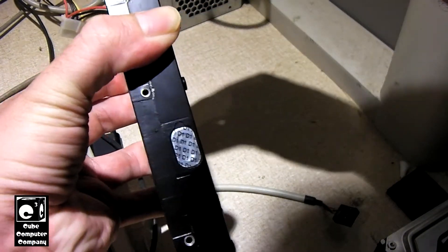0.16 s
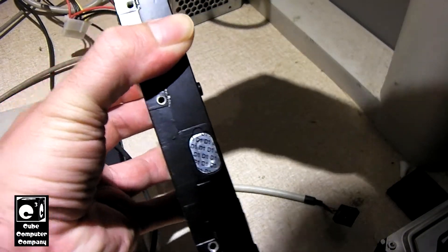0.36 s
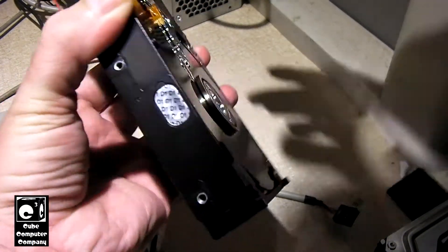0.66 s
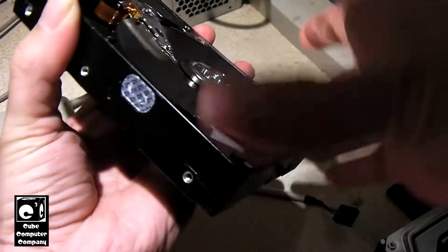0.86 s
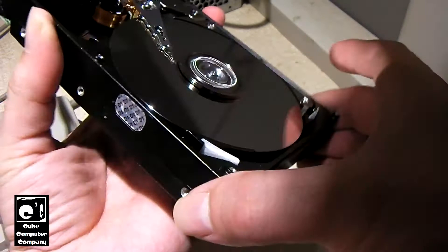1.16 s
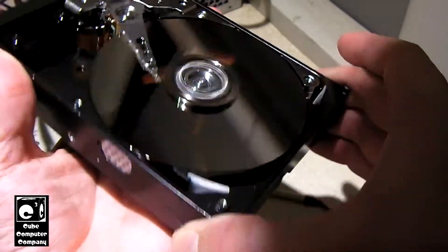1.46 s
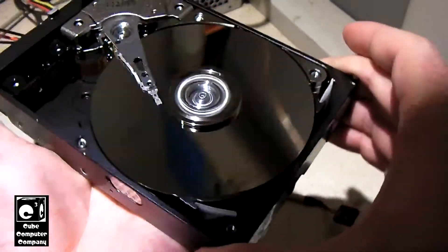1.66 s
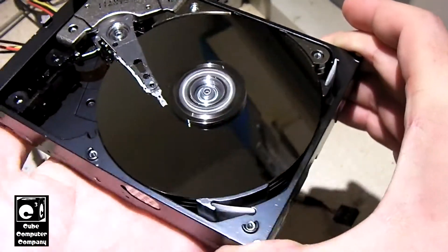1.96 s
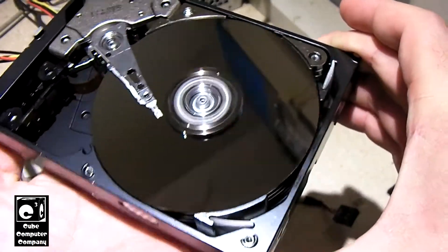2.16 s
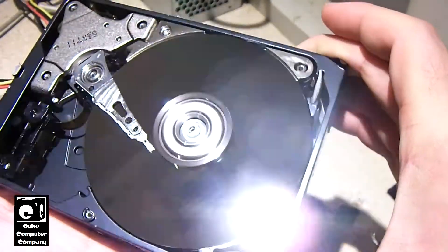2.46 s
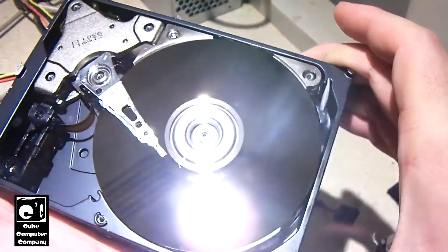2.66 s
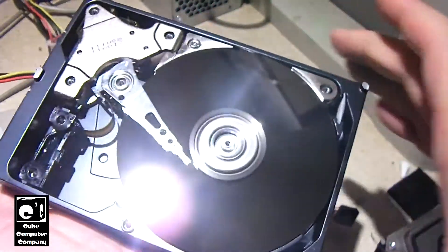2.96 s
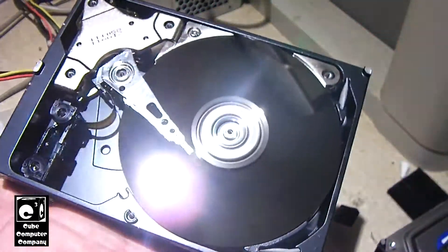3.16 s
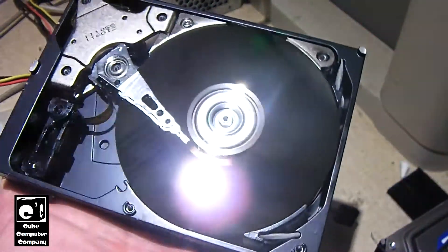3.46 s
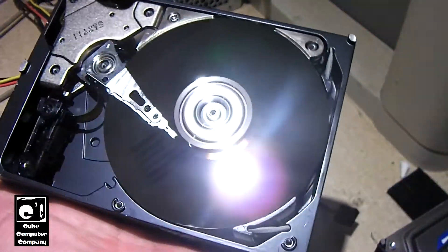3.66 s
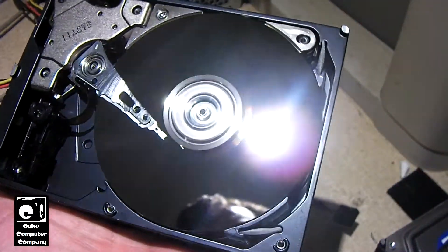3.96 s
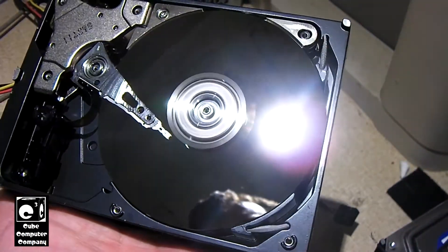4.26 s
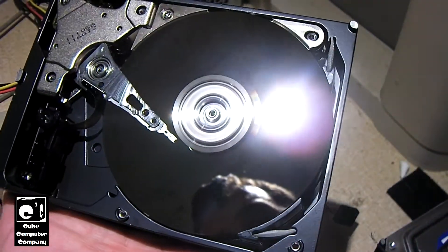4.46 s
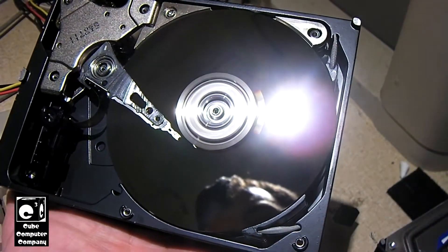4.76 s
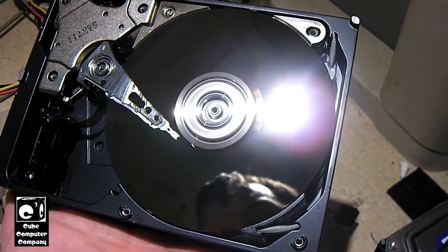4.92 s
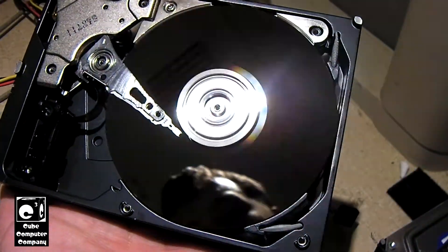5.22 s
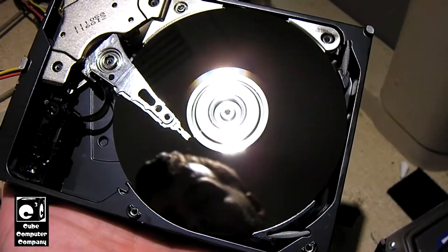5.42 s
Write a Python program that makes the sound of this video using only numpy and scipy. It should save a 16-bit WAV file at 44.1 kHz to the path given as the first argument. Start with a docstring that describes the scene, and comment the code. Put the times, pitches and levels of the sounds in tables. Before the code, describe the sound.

Close stereo pickup of a small disk drive starting up: light ticks, a bright electric buzz that stops abruptly, then fine scraping hiss with rising whines. Hard, dry clacks of the arm come over it in the first two seconds. Afterwards the spin smooths out and hollow, airy whooshing grows ever louder, covering a quiet, steady fan murmur in the room. No winding down is heard.

```python
"""An open hard drive, held near a camera, starts up: its motor buzzes in pulses while it finds its rotor.
Then the platters gather speed, and rubbing and motor steps ring them; short tones and rising whines stand out.
Noise shaped by the hollows of the casing makes a swelling rush of air. The arm clicks now and then:
each click is a thud, a ring of the casing and a rattle. Behind it all, filtered noise makes a murmur of fans."""
import sys
import numpy as np
from scipy import signal
from scipy.io import wavfile
from scipy.ndimage import uniform_filter1d, map_coordinates

SR = 44100
rng = np.random.default_rng(int(sys.argv[2]) if len(sys.argv) > 2 else 0)


def invert_db(level):
    """Linear amplitude ratio for a level in decibels (20 dB per decade), elementwise."""
    return 10 ** (np.asarray(level, dtype=float) / 20)


def persist_wave(psi):
    """Save psi, clipped to +-1, as 16-bit WAV."""
    counts = np.round(np.clip(psi, -1, 1) * 32767).astype(np.int16)
    wavfile.write(sys.argv[1], SR, np.atleast_2d(counts).T)


N = 246519

# Frequencies [Hz] and frame times [s] of the short-time spectra
HZ, T = np.fft.rfftfreq(1024, 1 / SR), np.arange(N // 256 + 5) * 256 / SR
STEP_HZ = 987  # motor steps a second at full speed

# How alike the drive's noise is in the two ears: f/Hz, likeness (1 same, 0 unrelated, -1 opposite)
DRIVE_LIKENESS = [(130, 0.14), (640, 0.92), (1410, 1), (3100, 0.81), (4700, 0.97), (6800, 0.004),
                  (10000, 0.46), (15000, 0.78)]
# How much louder the drive is on the left than on the right: f/Hz, level difference/dB
DRIVE_LEFT_DB = [(60, 3), (180, -5), (550, 3.5), (1650, 1.5), (4970, -2.5), (15000, -4)]
# How far the left ear is ahead in phase: f/Hz, lead/radians
DRIVE_LEAD_RAD = [(500, -0.41), (3700, -0.36), (4650, -1.87), (5250, -1.2), (5860, -0.69), (7800, -0.54),
                  (10100, -0.94), (12000, -0.87)]


def buzz():
    """Each current pulse shakes the motor frame with a burst of chopped force, partly the same each time."""
    # Frame modes, louder or softer as the drive is turned: f/Hz, width/Hz, early lift/dB, later lift/dB
    frame_modes = [(2740, 55, 7, 13), (3060, 80, 6, 3), (3370, 90, 8, 3), (3730, 90, 3, 6),
                   (4640, 70, 9, 5), (4935, 80, 3, 9), (5990, 70, 11, 6), (6430, 60, 7, 6),
                   (6582, 50, 4, 8), (6745, 110, 5, 13), (7054, 60, 8, 5), (7380, 60, 5, 10),
                   (7750, 50, 12, 15), (8150, 80, 5, 11), (8323, 50, 9, 6), (8700, 250, 7, 0),
                   (9306, 70, 11, 8)]
    pulse_hz, first_pulse_s = 161.1, 0.3185
    start_s, end_s, fade_s = 0.318, 0.866, 0.013
    force_db, repeated = -34, 0.53  # level before bursts and frame; share of power that repeats
    t = np.arange(N) / SR
    pulses = (t - first_pulse_s) * pulse_hz
    place = pulses % 1
    burst = 0.45 + np.exp(-((place - 0.35) / 0.3) ** 2)
    # Early on, every second pulse is weak
    weak = (pulses >= 2) & (pulses < 11) & (pulses % 2 < 1)
    burst = burst * np.where(weak, 0.2, 1)

    # The repeating pattern wanders as the rotor creeps
    patterns = rng.standard_normal((14, 3, round(SR / pulse_hz) + 1))
    drift = np.clip((t - start_s) / (end_s - start_s), 0, 1) * 13
    at = np.round(place * SR / pulse_hz)
    same = np.array([map_coordinates(patterns[:, k], [drift, at], order=1) for k in range(3)])
    fresh = rng.standard_normal((3, N))
    force = np.sqrt(repeated) * evened(same) + np.sqrt(1 - repeated) * fresh

    # The two ears hear different parts of the frame
    ears = 0.65 * force[0] + 0.85 * force[1:]
    running = (t > start_s) & (t < end_s)
    fade = np.clip(0.5 + 0.5 * (end_s - t) / fade_s, 0, 1)  # down to half, then it stops
    ears = ears * burst * invert_db(force_db) * running * fade

    # The hand turns the drive between these times [s], from one set of lifts to the other
    turned = np.interp(t, [0.33, 0.62], [0, 1])
    first, later = (frame_ring(np.array(frame_modes)[:, [0, 1, k]]) for k in (2, 3))
    rung = signal.oaconvolve(ears * (1 - turned), first, axes=1)
    rung = rung + signal.oaconvolve(ears * turned, later, axes=1)
    return invert_db([[1.5], [4]]) * rung[:, :N]  # left and right gain [dB]


def frame_ring(modes):
    """How the frame rings after one knock: its resonances as an impulse response of energy 1."""
    # Overall colour of the force from the motor coils: f/Hz, relative level/dB
    coil_colour = [(1300, -19.5), (2300, -16), (2700, -10), (4500, -5.5), (5600, -5.5), (6700, -6),
                   (9200, -6.5), (9800, -5.5), (13500, -5), (15700, -8)]
    hz = np.fft.rfftfreq(4096, 1 / SR)
    size = invert_db(read(coil_colour, hz)) * np.sqrt(1 + 1.7 * humps(modes, hz))
    log_size = np.log(np.maximum(size, 1e-4))
    # Minimum phase: the ring starts at the knock, never before it
    circle = np.r_[log_size, log_size[-2:0:-1]]
    body = np.fft.ifft(np.exp(circle - 1j * signal.hilbert(circle).imag)).real[:2048]
    return body[None] / np.linalg.norm(body)


def speed(t):
    """Platter speed as a share of full speed, which it approaches ever more slowly."""
    start_s, time_constant_s = 0.88, 8
    return 1 - np.exp(-np.maximum(t - start_s, 1e-4) / time_constant_s)


def hiss():
    """Rubbing heads and motor steps ring the platters; how the drive is held decides which modes are heard."""
    # How the drive is held: t/s, pose (0 edge on, 1 tilted, 2 face on)
    held = [(.93, .6), (1.15, 0.93), (1.45, 0.41), (1.95, 0.8), (2.3, 1.35), (2.75, 1.6), (3.7, 2),
            (4.1, 1.5), (5.59, 0.7)]
    # Smooth noise heard from the side: f/Hz, relative level/dB
    side_bed = [(900, -10), (2000, -8), (3500, -3), (5500, -1.5), (8000, -13), (11000, -13.5), (15700, -22)]
    # Smooth noise heard from the front: f/Hz, relative level/dB
    front_bed = [(900, -34), (2000, -61), (4000, -48), (5500, -12), (7000, 0.5), (11000, -5), (15700, -5)]
    # Platter modes heard from the side: f/Hz, width/Hz, relative level/dB
    edge_modes = [(6840, 60, -27), (9100, 110, -8), (11640, 66, 8), (13000, 160, -2), (13000, 150, 1),
                  (15200, 90, -3), (15200, 73, -4)]
    # Platter modes heard half-way through the turn: f/Hz, width/Hz, relative level/dB
    tilted_modes = [(2580, 60, -6), (6000, 40, -2), (8740, 60, 1), (9320, 160, 2), (10130, 90, 4),
                    (12100, 200, -1), (12960, 200, 4), (14060, 220, 4), (14850, 80, 0), (15150, 120, 1),
                    (15620, 150, 2)]
    # Platter modes heard from the front: f/Hz, width/Hz, relative level/dB
    face_modes = [(6000, 35, 2), (6520, 60, -1), (6760, 90, 3), (7086, 35, 1), (7370, 50, -1),
                  (8440, 90, 1), (8600, 60, -1), (9270, 110, 3), (10095, 110, 8.5), (11225, 200, 3),
                  (12290, 130, 5), (13030, 170, 4), (13560, 120, -1), (13980, 170, 4), (14400, 150, 0)]
    rub_db, rub_power = -23.5, 0.76  # level setting for full speed; growth as a power of speed
    rub_start_s, least_speed = 0.916, 0.038
    step_db = -10  # steps against the rubbing before lift-off

    pose = np.clip(np.interp(T, *np.transpose(held)), 0, 2)
    side, front = invert_db(read(side_bed)) ** 2, invert_db(read(front_bed)) ** 2
    edge_view = side + humps(edge_modes)
    tilted_view = np.sqrt(side * front) + humps(tilted_modes)
    face_view = front + humps(face_modes)
    views = edge_view, tilted_view, face_view
    power = sum(np.outer(view, np.maximum(1 - abs(pose - k), 0)) for k, view in enumerate(views))

    level_db = rub_db + rub_power * 20 * np.log10(np.maximum(speed(T), least_speed))
    level_db = np.where(T > rub_start_s, level_db, -90)
    size = levelled(np.sqrt(power), level_db)
    # The heads rise on their air cushion between 3.44 and 4.17 s and rub 6 dB less
    lift_off = invert_db(np.interp(T, [3.44, 4.17], [0, -6]))
    rubbed = field(size * lift_off, DRIVE_LIKENESS, DRIVE_LEFT_DB, DRIVE_LEAD_RAD, patchy_db=2.5)
    return rubbed + placed(steps(), size * np.sqrt(len(HZ)) * invert_db(step_db))


def steps():
    """One short jolt for each motor step, at its exact moment; the power is about 1 at any speed."""
    jolt_s = 0.002  # time for a jolt to shrink to about a third
    turns = np.cumsum(STEP_HZ * speed(np.arange(N) / SR)) / SR
    at = np.interp(np.arange(1, int(turns[-1]) - 1), turns, np.arange(N))
    # A step between two samples is spread over its neighbours
    near = np.floor(at)[:, None] + np.arange(-15, 17)
    size = np.sqrt(SR / (STEP_HZ * speed(at / SR)))[:, None]
    ticks = np.zeros(N)
    np.add.at(ticks, near.astype(int), size * np.sinc(near - at[:, None]) * np.hanning(32))
    # Every step shakes the frame alike
    jolt = rng.standard_normal(300) * np.exp(-np.arange(300) / SR / jolt_s)
    return signal.oaconvolve(ticks, jolt / np.linalg.norm(jolt))[:N]


def tones():
    """One platter mode splits into two tones as it spins; multiples of the step rate whine upward."""
    # Moments when the split mode sings, level before placing: start t/s, length/s, level/dB
    songs = [(.865, .07, -49), (1.70, .08, -55), (2.05, .1, -53), (2.19, .08, -54), (2.405, .1, -46),
             (2.545, .17, -46), (2.735, .14, -43), (2.9, .14, -51), (3.05, .1, -46), (3.21, .06, -49),
             (3.3, .1, -45), (3.5, .07, -48), (3.95, .14, -49)]
    # Whines, level before placing: middle t/s, multiple of the step rate, length/s, level/dB
    whines = [(2.43, 15.05, .26, -51), (3.76, 48, .25, -50), (3.98, 48, .3, -45)]
    rest_hz, up_hz, down_hz = 7780, 55, -410  # at rest, and the two shifts at full speed
    edge_s, whine_width_hz = 0.02, 12

    t = np.arange(N) / SR
    size = np.zeros(N)
    for start, length, db in songs:
        fade = np.clip(np.minimum(t - start, start + length - t) / edge_s, 0, 1)
        size = size + invert_db(db) * fade
    hz = rest_hz + np.outer([up_hz, down_hz], speed(t))
    out = size * np.sin(2 * np.pi * np.cumsum(hz, axis=1) / SR).sum(0)
    for middle, multiple, length, db in whines:
        place = np.clip((t - middle) / length, -0.5, 0.5)
        whine_hz = multiple * STEP_HZ * speed(middle + place * length)
        whine = resonate(rng.standard_normal(N), whine_hz, whine_width_hz)
        out = out + invert_db(db) * np.cos(np.pi * place) * evened(whine)
    return out


def rush():
    """Turbulent air in the hollows of the casing; the faster the platters, the louder and brighter."""
    # Colour of the air noise at its last level: f/Hz, relative level/dB
    air_colour = [(88, -46), (150, -28), (274, -26), (511, -23), (864, -15), (1250, -11), (1640, -1.5),
                  (2030, -6.5), (2830, -2), (4700, -7), (7350, -10.5), (7950, -14), (9470, -12),
                  (13400, -25), (15700, -40)]
    # Hollows of the casing: f/Hz, width/Hz, lift setting/dB
    hollows = [(810, 160, -1), (1600, 130, 0), (1500, 180, 1.5), (2355, 135, 4), (2730, 220, -2.5)]
    # Level setting, and growth as a power of the speed above the share where the air turns turbulent
    rush_db, rush_power, onset = 1.94, 1.868, 0.1
    level_db = rush_db + rush_power * 20 * np.log10(np.maximum(speed(T) - onset, 1e-3))
    # dB below the last level; beyond 38 dB the colour no longer changes
    slowness = np.minimum(level_db[-1] - level_db, 38)
    octaves = np.log2((HZ[:, None] + 1) / 1600)
    dulling_db = slowness * np.where(octaves > 0, 0.28 * octaves, -0.06 * octaves)
    # Slow air sings more purely in the hollows
    lift = 1 + np.outer(humps(hollows), 0.85 + 0.03 * slowness)
    shape = invert_db(read(air_colour)[:, None] - dulling_db) * np.sqrt(lift)
    return field(levelled(shape, level_db), DRIVE_LIKENESS, DRIVE_LEFT_DB, DRIVE_LEAD_RAD, patchy_db=0.32)


def clicks():
    """A thud that swells and fades in the hand-damped casing, its ring, and a rattle on the arm's modes."""
    # Clicks, thud peak before filtering: t/s, level/dB, thud f/Hz, thud length/s, rattle against thud/dB
    arm_clicks = [(0.011, -37, 1600, 0.0019, 13), (.245, -41, 3440, 0.0016, 1),
                  (0.532, -31, 1590, 0.0034, 0), (0.864, -39.5, 1400, 0.0026, 10),
                  (0.93, -48, 1600, .001, 10), (1.3399, -17.5, 1820, 0.00086, 7),
                  (1.342, -36, 1830, 0.0058, 0), (1.361, -31, 1840, .0008, 5),
                  (1.435, -42, 2800, 0.00064, 16.5), (1.651, -21, 2420, 0.0005, 4.5),
                  (1.655, -37, 2060, 0.0028, 6), (1.938, -15, 1594, 0.0074, -0.5)]
    # Modes of the arm: f/Hz, relative level/dB, time to fade by 60 dB/s
    arm_modes = [(3100, -7, .006), (3650, -4, .007), (4200, -3, .006), (4810, -1, .008), (5270, 0, .01),
                 (6200, -1, .01), (7000, -2, .007), (7500, -2, .007), (8670, -2, .008), (9800, -3, .008),
                 (10630, -3, .008), (11700, -4, .008), (13500, -7, .006)]
    casing_hz, casing_t60_s = 2600, 0.033

    out, t = np.zeros(N), np.arange(3000) / SR
    casing = invert_db(-60 * t / casing_t60_s) * np.sin(2 * np.pi * casing_hz * t)
    # A few hard hits, then a faint scrape
    settling = np.exp(-t[:900] / 0.0018) + 0.3 * np.exp(-t[:900] / 0.013)
    chatter = rng.standard_normal((len(arm_clicks), 900)) ** 3 * settling
    for (start, db, hz, length, rattle_db), hits in zip(arm_clicks, chatter):
        swell = 1 - np.exp(-4 * t / length)
        thud = swell * np.exp(-(t / length) ** 1.7) * np.sin(2 * np.pi * hz * t)
        # A longer thud rings the casing more: 3 dB for each doubling
        ring_db = -8.5 + 3 * np.log2(length / 0.002)
        # A shorter, harder blow reaches higher modes [dB per octave]
        bright_db = 1.8 * np.log2(0.0032 / length)
        arm = np.zeros(len(t))
        for k, (f, level, t60) in enumerate(arm_modes):
            mode_db = level + bright_db * np.log2(f / 4000) - 60 * t / t60
            arm += (-1) ** k * invert_db(mode_db) * np.sin(2 * np.pi * f * t)
        rattle = signal.oaconvolve(hits, arm)[:len(t)]
        sound = thud / abs(thud).max() + invert_db(ring_db) * casing
        sound = sound + invert_db(rattle_db) * rattle / abs(rattle).max()
        out[round(start * SR):][:len(t)] += invert_db(db) * sound
    # A small object sheds little bass
    return signal.sosfilt(signal.butter(2, 700, "high", fs=SR, output="sos"), out)


def room():
    """Steady murmur of fans: broad noise plus a few fuzzy tones made by narrow resonances."""
    # Colour of the murmur: f/Hz, relative level/dB
    murmur_colour = [(8.8, -38), (15, 3), (22, -15), (145, -14.5), (178, -25), (275, -10.5), (390, -19),
                     (478, -16.5), (881, -19.5), (1110, -22), (2110, -19.5), (2510, -21.5), (4240, -20.5),
                     (15700, -29.5)]
    # Likeness of the two ears: f/Hz, likeness (-1 to 1)
    murmur_likeness = [(25, .75), (60, 0.22), (130, -0.17), (290, 0.0054), (600, -0.23), (1650, -0.51),
                       (5000, -0.43), (15000, 0.047)]
    # Left against right: f/Hz, level difference/dB
    murmur_left = [(60, 3), (380, 2.0), (2380, 0), (15000, 0.5)]
    # Fuzzy fan tones: f/Hz, width/Hz, level/dB, likeness of the two ears (-1 to 1)
    fan_tones = [(27, 4.1, -58, 1), (46.3, 7.4, -53.5, 0.039), (126.5, 20, -55, -0.6),
                 (284.7, 8.3, -59, 0.031), (471, 17, -69, 0.68)]
    murmur = levelled(invert_db(read(murmur_colour))[:, None], -40)
    out = field(murmur, murmur_likeness, murmur_left, [(1, 0)], patchy_db=1.5)
    for hz, width, db, like in fan_tones:
        one, other = evened(resonate(rng.standard_normal((2, N)), hz, width))
        out = out + invert_db(db) * np.array([one, like * one + np.sqrt(1 - like ** 2) * other])
    return out


def evened(x):
    """Scales to rms 1."""
    return x / np.sqrt(np.mean(x ** 2) + 1e-20)


def read(points, hz=HZ):
    """Reads a spectrum table along a log-frequency axis, since hearing follows ratios of frequency."""
    f, value = np.transpose(points)
    return np.interp(np.log(hz + 1), np.log(f + 1), value)


def humps(modes, hz=HZ):
    """Power of a set of resonances, each a hump around its own frequency."""
    return sum(invert_db(db) ** 2 / (1 + (2 * (hz - f) / w) ** 2) for f, w, db in modes)


def resonate(x, hz, width):
    """A resonance of gain 1: shifts hz down to zero, smooths, and shifts back."""
    turn = np.exp(2j * np.pi * np.cumsum(hz * np.ones(N)) / SR)
    r = np.exp(-np.pi * width / SR)
    return 2 * (turn * signal.lfilter([1 - r], [1, -r], x / turn)).real


def levelled(shape, level_db):
    """Scales each frame of magnitudes so that their squares add up to the wanted power."""
    return shape / np.sqrt((shape ** 2).sum(0)) * invert_db(level_db)


def field(size, same, left, lead, patchy_db):
    """Two-ear noise shaped by short-time magnitudes, with random louder and softer patches."""
    a, b, c, d, patches = rng.standard_normal((len(T), len(HZ), 5)).T
    patches = uniform_filter1d(patches, size=10, axis=0)  # along frequency
    patches = evened(uniform_filter1d(patches, size=8, axis=1))  # along time
    like = read(same)[:, None]
    one = a + 1j * b
    other = like * one + np.sqrt(1 - like ** 2) * (c + 1j * d)
    side = (invert_db(read(left) / 2) * np.exp(0.5j * read(lead)))[:, None]
    z = np.array([one * side, other / side]) * size * invert_db(patchy_db * patches)
    return signal.istft(z, nperseg=1024, noverlap=768)[1][:, :N]


def placed(x, size):
    """Colours one signal by short-time magnitudes and gives it the drive's place between the ears."""
    z = signal.stft(np.pad(x, (0, 2048)), nperseg=1024, noverlap=768)[2][:, :len(T)]
    side = (invert_db(read(DRIVE_LEFT_DB) / 2) * np.exp(0.5j * read(DRIVE_LEAD_RAD)))[:, None]
    return signal.istft(np.array([z * side, z / side]) * size, nperseg=1024, noverlap=768)[1][:, :N]


def from_drive(x, spread):
    """A near source: direct sound a little later on the left, plus early reflections that differ by ear."""
    taps = rng.standard_normal((2, 900)) * invert_db(-60 * np.arange(900) / SR / 0.018)
    taps *= spread / np.linalg.norm(taps[0])
    taps[[0, 1], [2, 0]] = invert_db([-1, 1])  # direct sound: left 2 samples late and softer
    return signal.oaconvolve(x[None], taps, axes=1)[:, :N]


def scene():
    """The drive in the hands, over the room."""
    drive = buzz() + hiss() + placed(tones(), 0.85) + rush()
    return drive + from_drive(clicks(), 0.35) + room()


def top_cut(x):
    """Nothing passes above the cut-off."""
    return signal.sosfilt(signal.butter(12, 17090, fs=SR, output="sos"), x)


def record(dry):
    """The camera filters out a narrow band and the top of the treble, and adds a small offset."""
    notch_hz, notch_width_hz, top_hz = 7915, 170, 15700
    notched = signal.lfilter(*signal.iirnotch(notch_hz, notch_hz / notch_width_hz, SR), dry)
    lowpass = signal.firwin(801, top_hz, window=("kaiser", 9), fs=SR)
    limited = signal.oaconvolve(notched, lowpass[None], "same")
    return top_cut(limited - 0.0043)


dry = scene()
out = record(dry)
persist_wave(out)
```